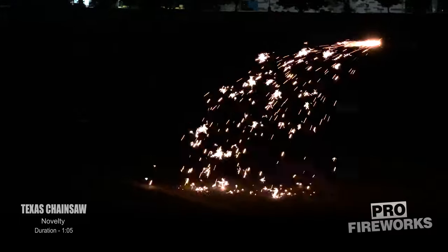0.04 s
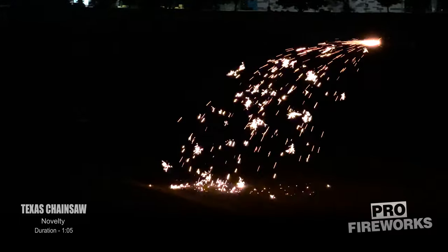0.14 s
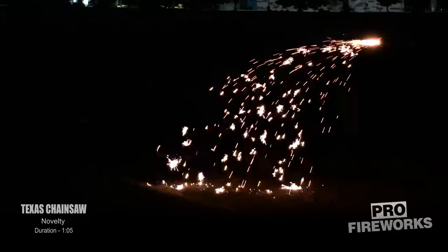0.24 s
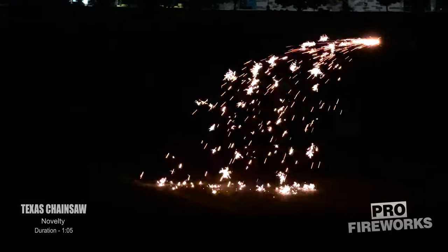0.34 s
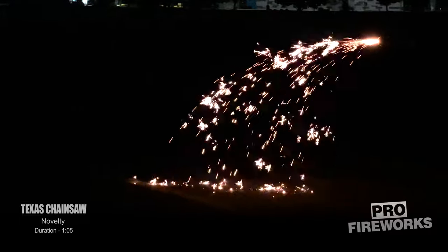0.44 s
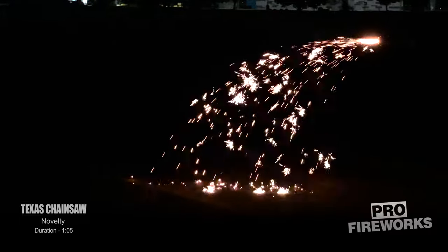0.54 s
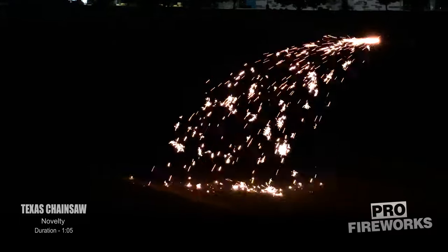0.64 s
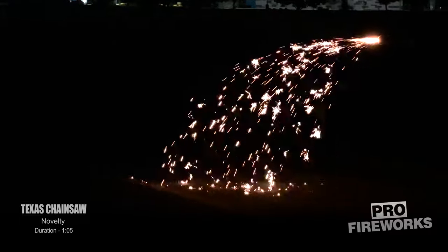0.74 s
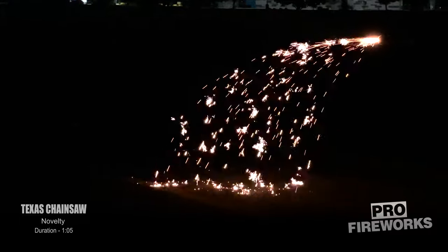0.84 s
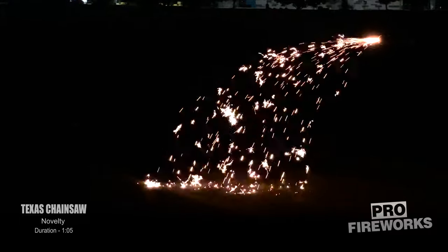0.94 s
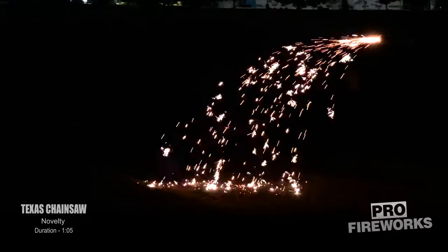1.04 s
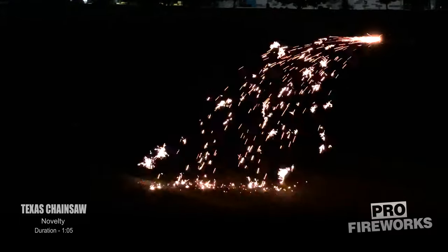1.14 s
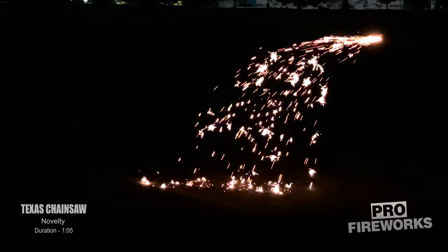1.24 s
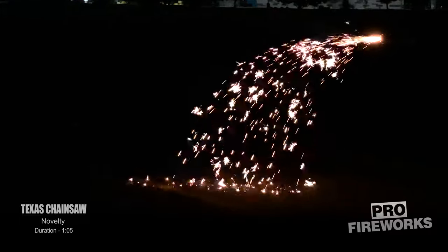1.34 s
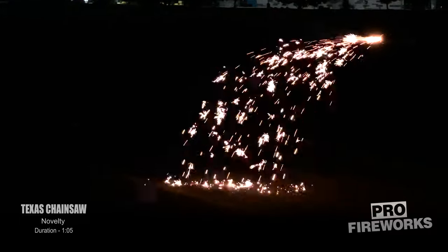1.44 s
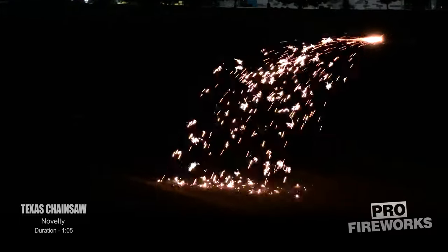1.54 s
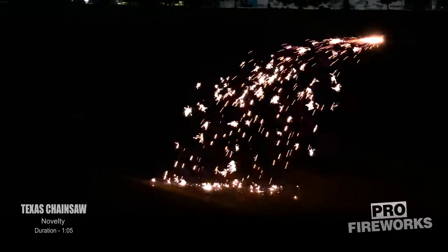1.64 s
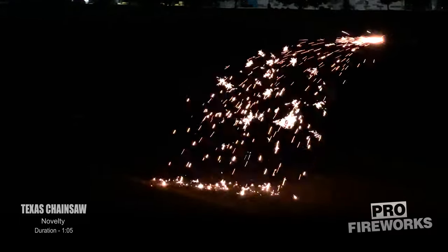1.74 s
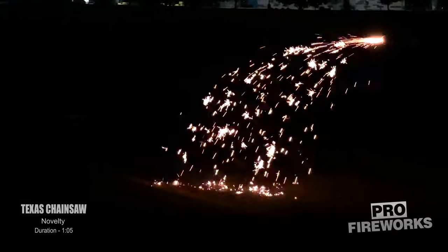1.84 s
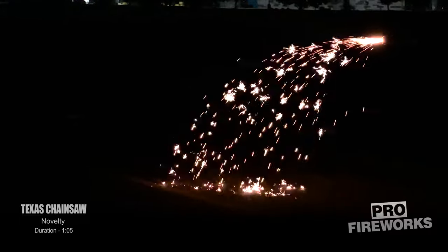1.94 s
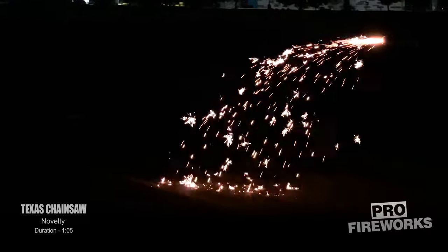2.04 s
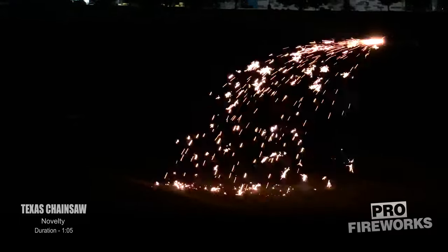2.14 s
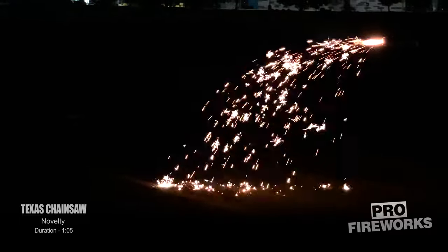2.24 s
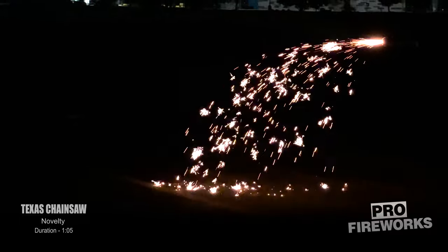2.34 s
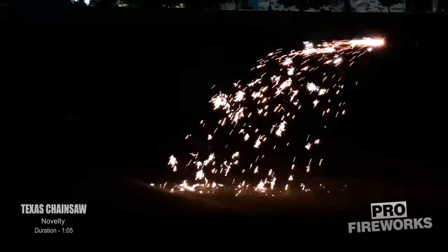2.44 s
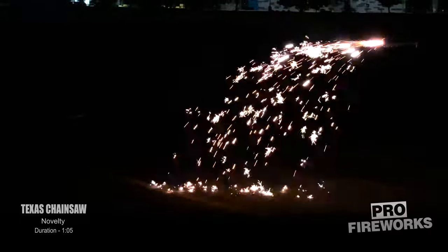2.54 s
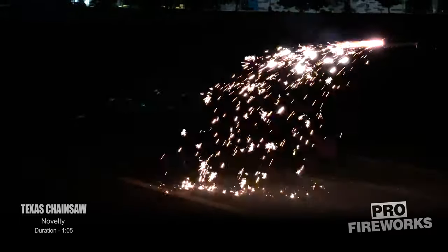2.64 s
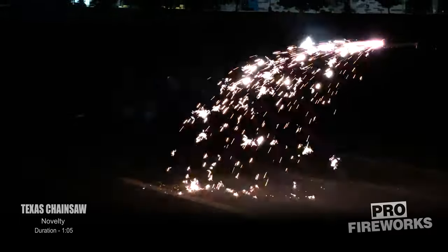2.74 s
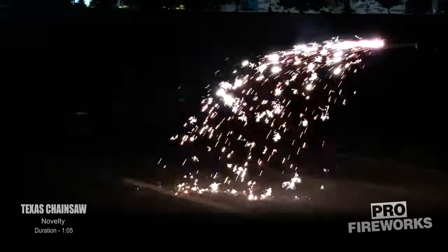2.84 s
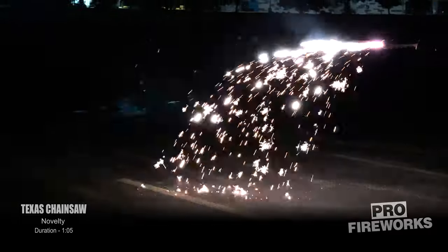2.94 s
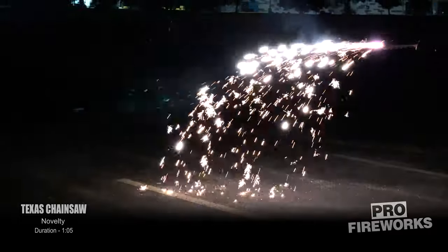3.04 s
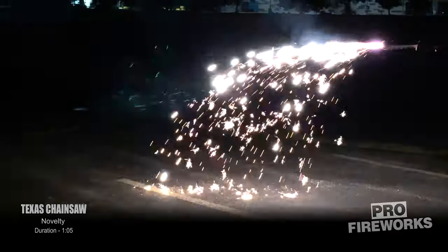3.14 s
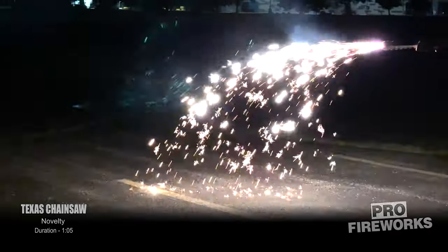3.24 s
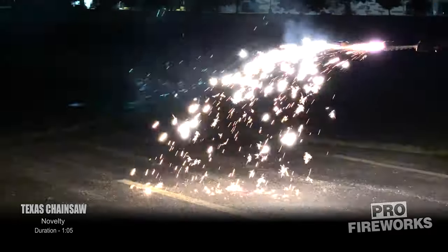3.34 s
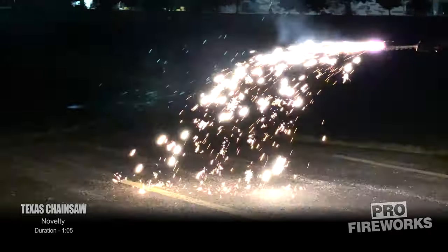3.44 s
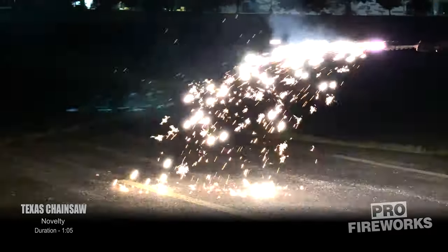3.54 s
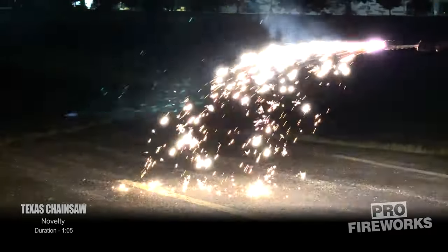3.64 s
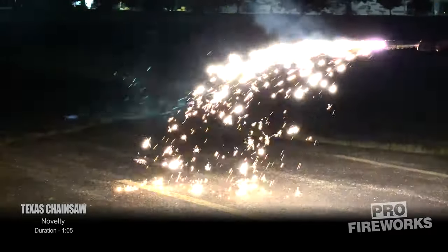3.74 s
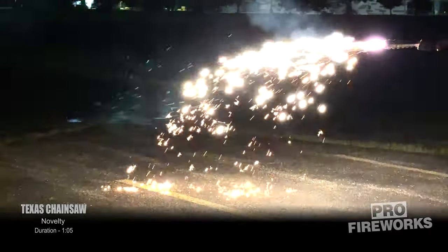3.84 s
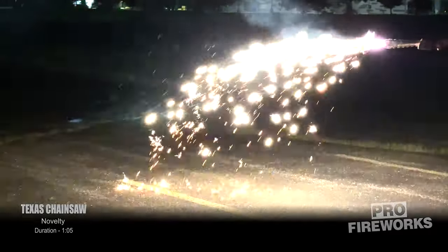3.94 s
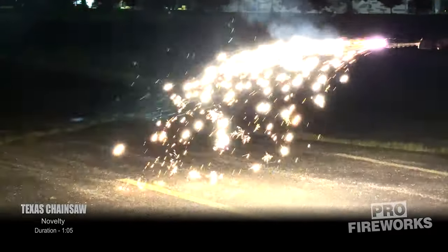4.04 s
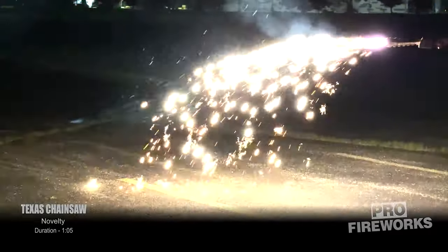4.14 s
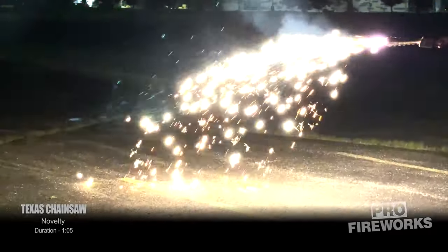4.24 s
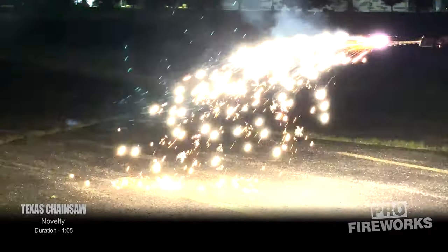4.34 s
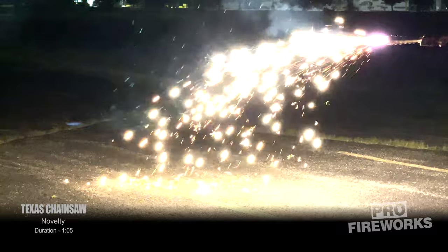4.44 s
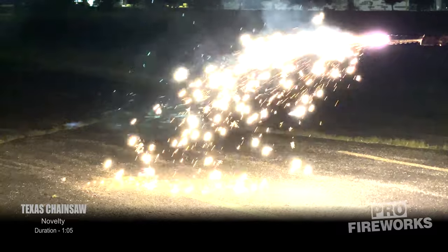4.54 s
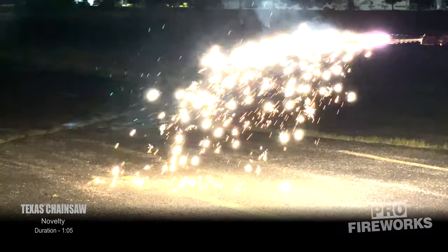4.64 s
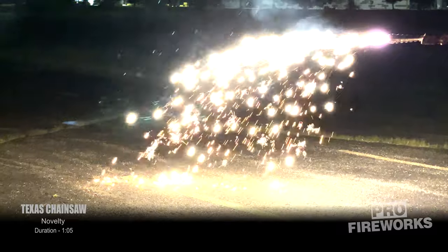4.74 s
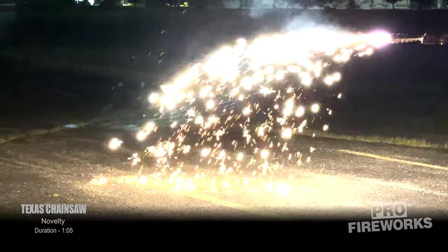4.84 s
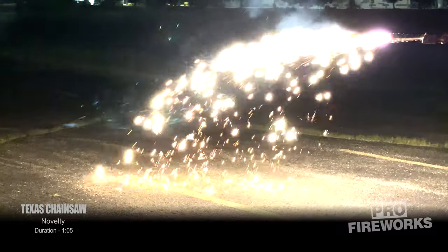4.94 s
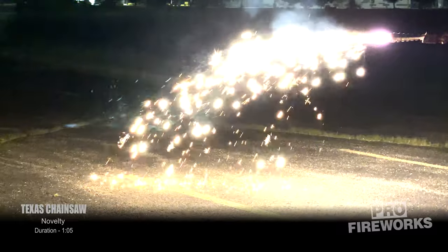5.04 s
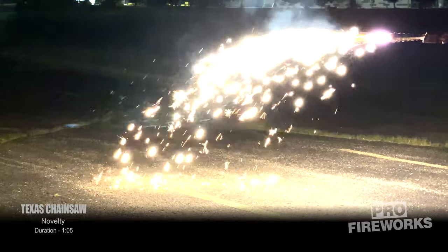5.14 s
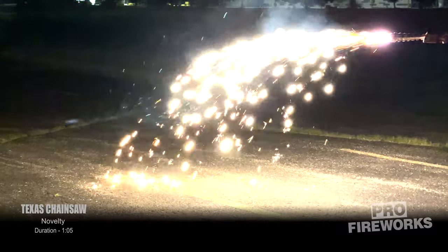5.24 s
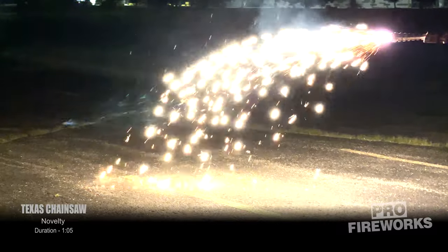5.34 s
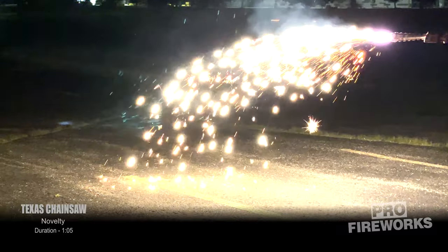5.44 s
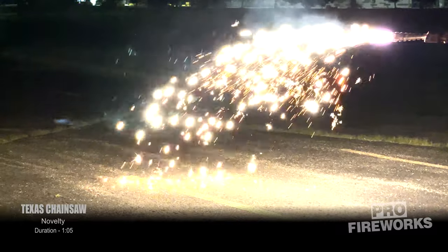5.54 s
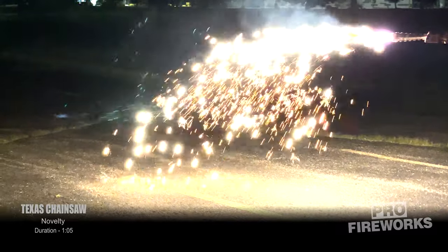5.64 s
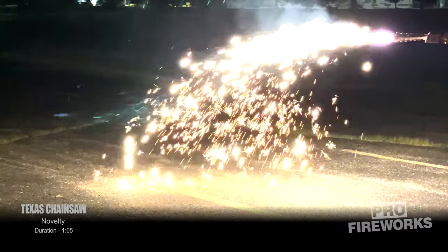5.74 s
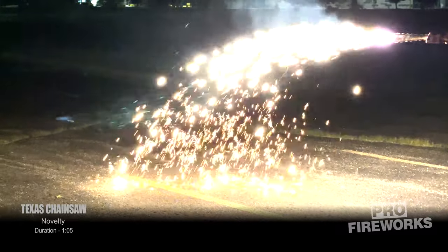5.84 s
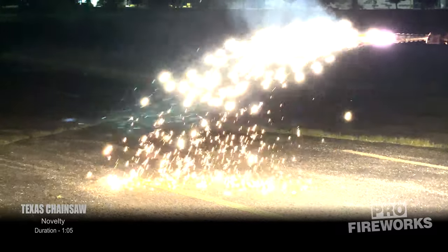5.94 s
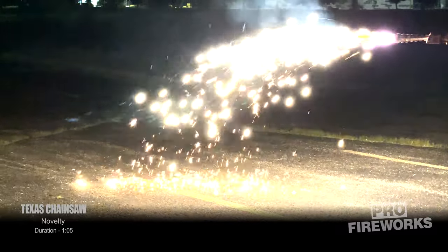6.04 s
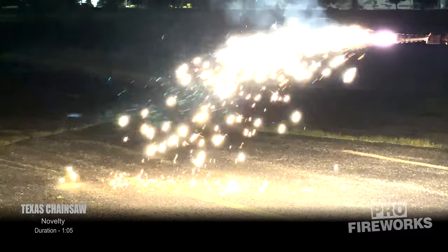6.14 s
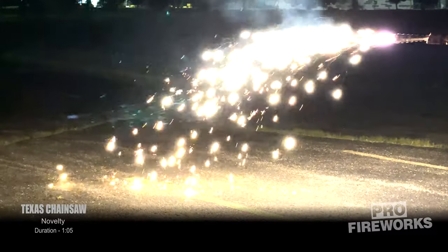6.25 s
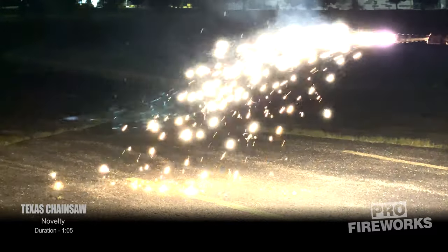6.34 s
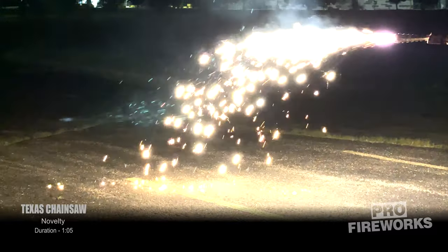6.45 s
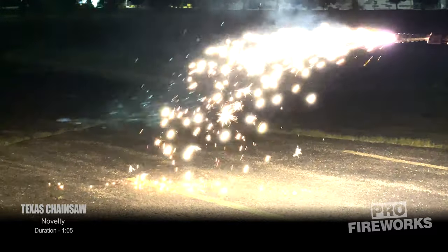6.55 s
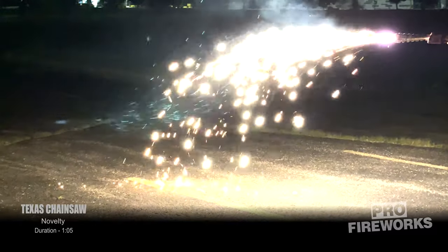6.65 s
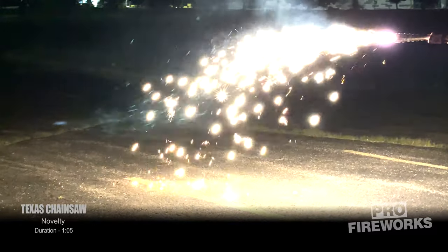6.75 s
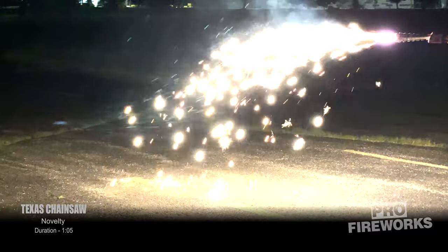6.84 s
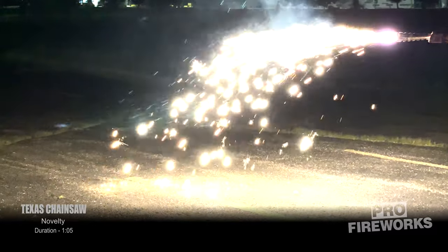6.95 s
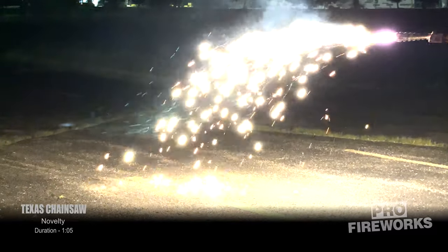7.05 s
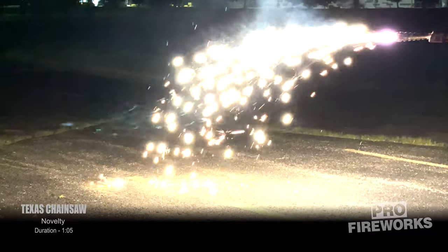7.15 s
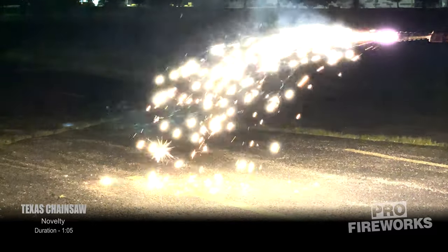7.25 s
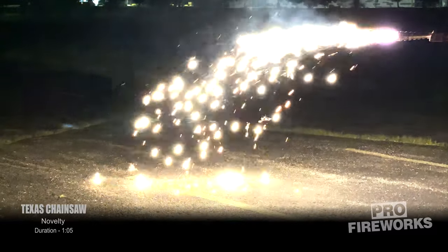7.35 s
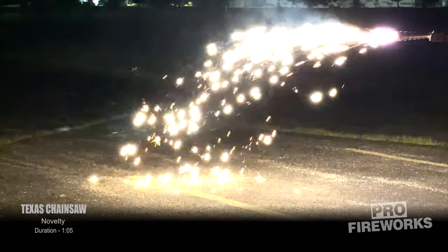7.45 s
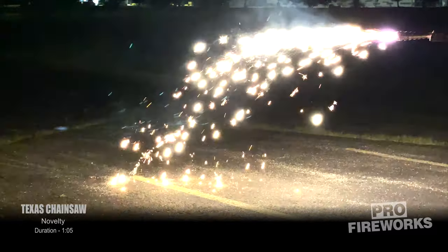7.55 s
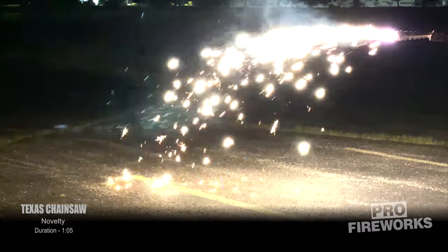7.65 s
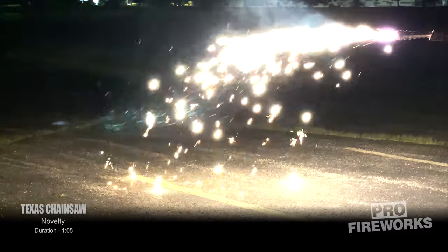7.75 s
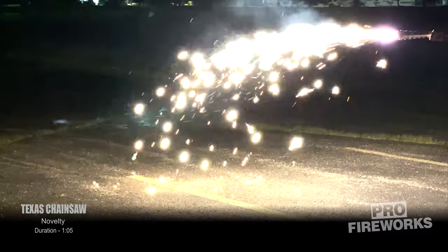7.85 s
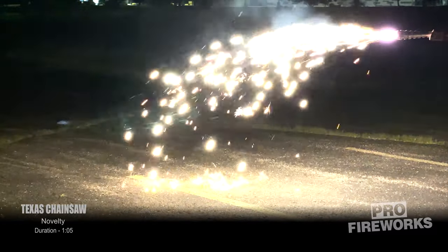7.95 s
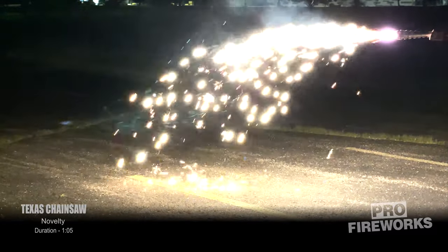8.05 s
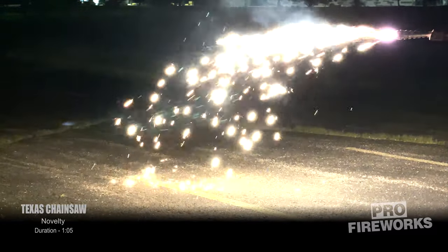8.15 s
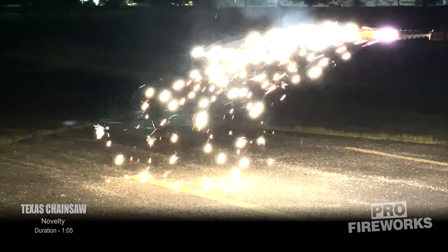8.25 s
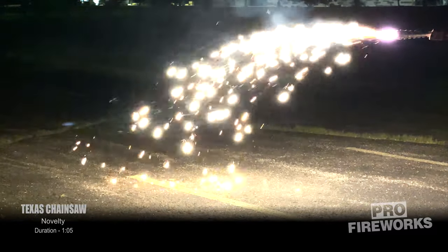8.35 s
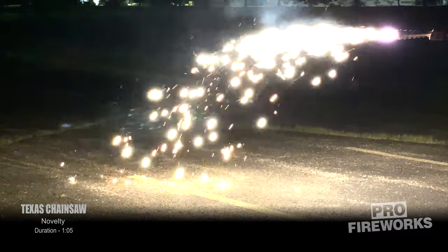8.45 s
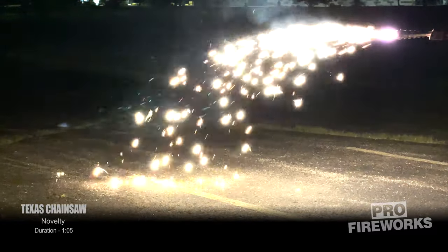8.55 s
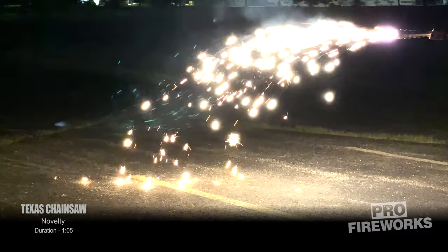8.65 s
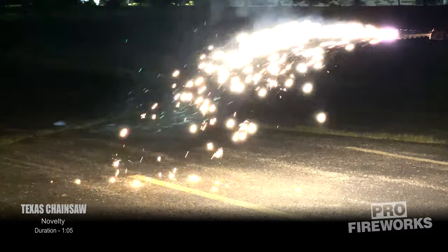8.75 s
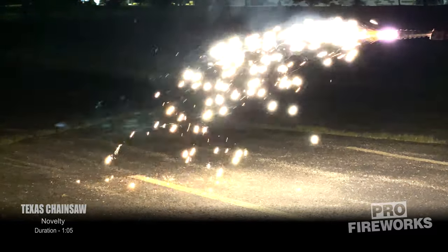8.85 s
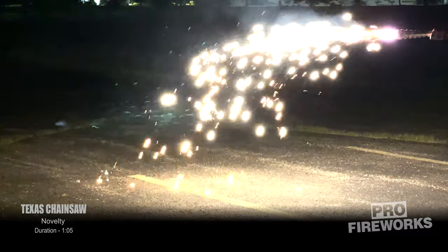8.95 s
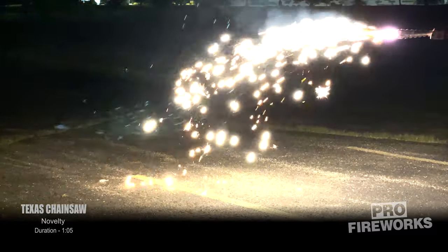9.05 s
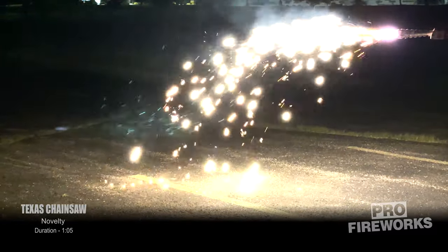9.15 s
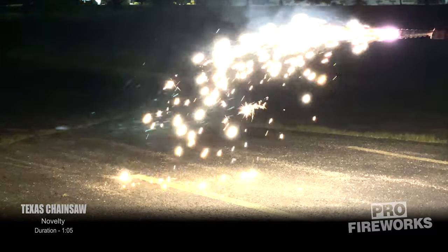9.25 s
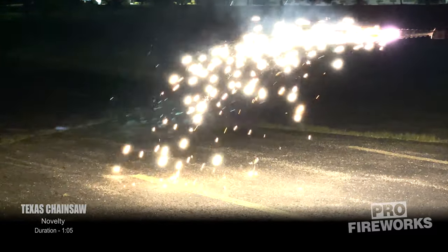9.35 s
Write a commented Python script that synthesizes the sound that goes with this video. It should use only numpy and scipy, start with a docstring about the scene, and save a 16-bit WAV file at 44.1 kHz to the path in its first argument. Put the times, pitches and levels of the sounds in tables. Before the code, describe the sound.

Outdoors on a paved lot at night, a sideways spark fountain starts as a faint fizz beneath distant traffic rumble and a low machine hum. Around three seconds it flares into a fluttering roar and bright hiss, with dense irregular pops and snaps doubled by the pavement. It keeps burning strongly to the end, hissier late on. The microphone faces it from the front, nearly centred, with little echo.

```python
"""A spark fountain burns sideways from a stand on a paved lot at night and flares up after a few seconds.
Its gas jet is fluttering noise, a roar and a hiss, combed by the bounce off the pavement.
The sparks fizz as dense random clicks over fine noise; the big ones pop as single shaped clicks.
Behind lie distant traffic, a swelling low rumble, and a machine hum of narrow noise bands.
Two microphone ports hear it all from the front, with a little scattered sound to the sides."""
import sys
import numpy as np
from scipy import signal
from scipy.fft import rfft, irfft, next_fast_len
from scipy.io import wavfile
from scipy.ndimage import uniform_filter1d

SR = 44100
rng = np.random.default_rng(int(sys.argv[2]) if len(sys.argv) > 2 else 0)


def put_to_file(sound):
    """Save the sound as 16-bit audio at rate SR, in the file named by the first command-line argument."""
    columns = np.atleast_2d(sound).T  # one column per channel
    safe = np.clip(columns, -1, 1)
    whole_steps = np.round(safe * 32767)
    wavfile.write(sys.argv[1], SR, whole_steps.astype(np.int16))


N = 414981
SIZE = next_fast_len(N)
HZ = np.arange(SIZE // 2 + 1) * SR / SIZE
TIME = np.arange(N) / SR


def undb(db):
    """Gain of a level in dB."""
    return 10 ** (np.asarray(db) / 20)


def along(table):
    """Spread a table of pitch and value over every frequency bin, evenly in log frequency."""
    hz, value = np.transpose(table)
    return np.interp(np.log(HZ + 1), np.log(hz + 1), value)


def shape(x, response):
    """Filter by a frequency response."""
    return irfft(rfft(x, SIZE) * response, SIZE)[..., :N]


def unit(x, lo_hz, hi_hz):
    """Scale so that one band has rms 1."""
    band = shape(x, (HZ > lo_hz) & (HZ < hi_hz))
    return x / band.std()


def walk(rate_hz):
    """Random levels, each held 1 / rate_hz seconds, then smoothed twice; spread 1."""
    hold = int(SR / rate_hz)
    steps = np.repeat(rng.standard_normal(N // hold + 1), hold)
    smooth = uniform_filter1d(uniform_filter1d(steps, hold), hold)[:N]
    return smooth / smooth.std()


def noise(colour):
    """Steady noise with the spectrum of a table."""
    return shape(rng.standard_normal(N), undb(along(colour)))


def clicks(start_s, size, lag_ms, bounce_gain):
    """Impulses, each followed by its bounce off the pavement."""
    x = np.zeros(N)
    direct = np.clip(start_s * SR, 0, N - 1).astype(int)
    bounced = np.clip((start_s + lag_ms / 1000) * SR, 0, N - 1).astype(int)
    np.add.at(x, direct, size)
    np.add.at(x, bounced, size * bounce_gain)
    return x


def nozzle_paths():
    """Direct sound plus delayed, duller copies: their interference combs the spectrum."""
    # indirect paths, the pavement first: lag_ms, level_db, treble_loss_db_per_khz, phase_turn_rad
    bounces = [(1.3327, 0.34, 1.1, -0.034), (1.078, -7, 3.5, 1), (2.8, -8, 7.5, -0.85)]
    response = 1
    for lag_ms, level_db, loss_db, turn_rad in bounces:
        phase = turn_rad - 2 * np.pi * HZ * lag_ms / 1000
        response = response + undb(level_db - loss_db * HZ / 1000) * np.exp(1j * phase)
    return response


def jet(roar_db, hiss_db):
    """Turbulent gas sheds eddies: a roar and a hiss flutter together, with spurts of powder on top."""
    # spectrum of the roar: pitch_hz, relative level_db
    roar_colour = [(40, -28), (150, -0.5), (400, -1), (800, -1), (1500, -0.5), (2500, -6.5), (4000, -18),
                   (8000, -36)]
    # spectrum of the hiss: pitch_hz, relative level_db
    hiss_colour = [(500, -8.5), (1500, 5.5), (3000, 2), (5000, -0.5), (8000, -6.5), (13000, -5.5)]
    # lumps of powder spat through the nozzle: start_s, length_s, level_db (added to the hiss gain)
    spurts = [(4.396, 0.025, -34), (5.354, 0.03, -34), (6.566, 0.013, -40), (8.815, .06, -52)]
    paths = nozzle_paths()
    flutter = walk(18)

    roar = unit(shape(noise(roar_colour), paths), 624, 2160)
    upper = shape(roar, 1 / (1 + (1700 / (HZ + 1)) ** 3))
    # a faster jet sheds smaller eddies, so the upper roar grows more than the rest
    roar = roar - upper + upper * undb(0.75 * (roar_db + 31.5))
    roar = roar * undb(roar_db + 0.39 * flutter + 0.6 * walk(60))

    hiss_gain = undb(hiss_db - 3.5 + 0.29 * flutter + 1.9 * walk(70))
    for start_s, length_s, level_db in spurts:
        inside_s = np.minimum(TIME - start_s, start_s + length_s - TIME)
        hiss_gain = hiss_gain + undb(level_db) * np.clip(inside_s / 0.0027, 0, 1)  # 2.7 ms ramps
    hiss = unit(shape(noise(hiss_colour), paths), 2880, 9700)
    return roar + hiss * hiss_gain


def fizz(fizz_db, count=6000):
    """Countless small sparks crackle at every height, some far louder than the rest, over a fine hiss."""
    # spectrum of the crackle: pitch_hz, relative level_db
    crackle_colour = [(500, -19), (2000, -16), (5000, -1), (8000, -1), (13000, 4)]
    # spectrum of the fine hiss, with the sound chain's upper cut-off near 12.4 kHz:
    # pitch_hz, relative level_db
    bed_colour = [(1000, -10), (3000, -8), (5500, -6.5), (8000, -1), (11000, -3), (11800, -7), (12350, -19),
                  (12500, -30)]
    when, size, height = rng.random((count, 3)).T
    loudness = (1.015 - size) ** -0.55  # a few loud ones among many soft
    lag_ms = 0.2 + 1.1 * height  # higher sparks bounce later
    crackle = shape(clicks(when * N / SR, loudness, lag_ms, 0.75), undb(along(crackle_colour)))
    crackle = unit(crackle, 8200, 10200)
    bed = unit(noise(bed_colour), 8170, 9880) * undb(1.12 * walk(15) + 1.0 * walk(90))
    # the harder it burns, the more the crackle stands out of the hiss
    crackle_gain = undb(-3.5 + 0.8 * (fizz_db + 53.0))
    return undb(fizz_db) * (crackle_gain * crackle + undb(-1.5) * bed)


def small_pops():
    """Smaller bursts at random once the flare is up; high sparks bounce later and are commoner."""
    from_s, pops_per_s = 3.3, 11
    loudest_db, spread_db = -21.5, 5.5  # impulse levels reach down by the spread
    span_s = N / SR - from_s
    when, size, height = rng.random((int(span_s * pops_per_s), 3)).T
    start_s = from_s + when * span_s
    level_db = loudest_db - spread_db * size
    lag_ms = 0.25 + 1.1 * np.sqrt(height)
    return np.array([start_s, level_db, lag_ms]).T


def pops():
    """Sharp bursts, each doubled by the pavement, with a faint short tail off the things around."""
    # big sparks bursting: start_s, level_db (of the impulse before its colour), pavement lag_ms
    big_pops = [(3.0848, -22, 0.86), (3.2366, -22, 1.18), (3.3726, -18, 1.18), (3.3978, -18, 1.13),
                (3.4867, -14, 1.09), (3.5723, -17, 0.86), (3.6378, -17, 1.25), (3.7012, -19, 1.29),
                (3.7397, -20, 1.07), (3.7427, -18, 0.91), (3.7799, -14, 0.88), (3.7982, -15, 0.88),
                (3.8936, -18, 0.93), (3.9031, -14, 1.02), (4.0086, -17, 1.11), (4.1115, -19, 1.0),
                (4.131, -14, 1.07), (4.2648, -8, 1.11), (4.2966, -18, 0.95), (4.3552, -11, 0.88),
                (4.3948, -16, 0.66), (4.4377, -21, 0.84), (4.4667, -12, 0.73), (4.4939, -20, 0.57),
                (4.6065, -13, 0.98), (4.6398, -13, 1.04), (4.686, -13, 0.82), (4.7427, -15, 1.13),
                (4.767, -13, 1.27), (4.8117, -13, 1.02), (4.8363, -16, 0.79), (4.8732, -13, 0.95),
                (4.8807, -16, 0.88), (5.0167, -17, 0.52), (5.0377, -15, 0.5), (5.0407, -21, 0.82),
                (5.093, -16, 0.5), (5.0995, -15, 1.13), (5.1046, -12, 1.09), (5.1289, -21, 1.07),
                (5.138, -19, 1.09), (5.1553, -16, 0.7), (5.162, -17, 1.07), (5.229, -19, 0.82),
                (5.2466, -18, 0.93), (5.2691, -16, 1.13), (5.3058, -21, 1.04), (5.4726, -21, 0.66),
                (5.5005, -16, 0.68), (5.5222, -15, 0.57), (5.6068, -15, 1.07), (5.6229, -17, 1.04),
                (5.6257, -19, 1.07), (5.6719, -21, 1.34), (5.712, -10, 0.39), (5.7718, -18, 0.68),
                (5.805, -16, 1.09), (5.8812, -20, 1.36), (5.9164, -16, 1.2), (5.9685, -13, 0.84),
                (6.0297, -12, 0.88), (6.0735, -19, 0.88), (6.082, -15, 1.16), (6.0902, -16, 1.02),
                (6.0995, -17, 1.29), (6.1741, -20, 0.29), (6.2319, -19, 1.02), (6.2577, -16, 1.02),
                (6.2851, -16, 1.07), (6.371, -11, 1.07), (6.4773, -12, 0.75), (6.5182, -16, 1.2),
                (6.556, -17, 1.27), (6.5678, -9, 0.79), (6.5828, -20, 0.82), (6.622, -14, 0.39),
                (6.639, -14, 1.27), (6.7348, -15, 1.04), (6.77, -15, 0.34), (6.793, -11, 1.04),
                (6.8136, -17, 1.18), (6.8284, -15, 0.79), (6.8597, -17, 0.79), (6.9371, -13, 0.36),
                (6.9488, -12, 1.11), (7.0043, -21, 0.98), (7.0794, -15, 1.22), (7.1515, -17, 1.13),
                (7.1637, -21, 0.27), (7.2734, -11, 0.86), (7.2891, -17, 0.54), (7.3103, -12, 1.07),
                (7.3199, -21, 0.34), (7.3522, -9, 0.68), (7.3881, -18, 1.02), (7.4821, -11, 0.82),
                (7.5149, -16, 0.7), (7.7188, -17, 1.16), (7.8644, -15, 1.18), (7.9108, -18, 1.18),
                (8.0462, -10, 0.7), (8.0649, -14, 1.02), (8.0943, -14, 1.0), (8.0948, -9, 0.82),
                (8.1148, -12, 0.91), (8.3181, -21, 1.16), (8.3488, -12, 1.18), (8.3856, -14, 1.25),
                (8.4395, -14, 1.04), (8.4414, -14, 1.02), (8.4621, -17, 0.95), (8.6296, -21, 1.22),
                (8.7344, -19, 0.39), (8.8178, -8, 1.22), (8.8558, -13, 0.75), (8.8665, -15, 0.93),
                (8.9112, -17, 1.07), (8.9149, -11, 0.68), (8.9784, -21, 0.29), (9.1174, -18, 0.75),
                (9.2657, -20, 1.34), (9.2798, -15, 0.93)]
    # spectrum of a burst: pitch_hz, gain_db
    pop_colour = [(100, -4), (500, 0), (1200, 13.5), (2200, 8.5), (5000, 3), (8000, 7), (11000, 4),
                  (13000, 6.5)]
    start_s, level_db, lag_ms = np.vstack([big_pops, small_pops()]).T
    recoil = 1j * HZ / (700 + 1j * HZ)  # the air swings back after each push
    pairs = clicks(start_s, undb(level_db), lag_ms, undb(-1.5))
    bursts = shape(pairs, undb(along(pop_colour)) * recoil)
    tail = rng.standard_normal(2000) * np.exp(-TIME[:2000] / 0.006)  # 6 ms decay
    return bursts + undb(-34.5) * signal.fftconvolve(bursts, tail)[:N]


def traffic():
    """Distant traffic: low noise, its treble lost, at rms 1 from 25 to 400 Hz."""
    # spectrum of the rumble: pitch_hz, relative level_db
    rumble_colour = [(22, -43), (33, -27), (42, -8.5), (80, -3.5), (100, -4.5), (130, -5), (190, -6.5),
                     (285, -11), (350, -18), (450, -21.5), (700, -24), (1200, -38.5), (2500, -52)]
    return unit(noise(rumble_colour), 25, 400)


def machine_hum():
    """A machine's wavering hum: noise in narrow resonances, the narrower the steadier."""
    # hum bands: pitch_hz, width_hz, level_db (before the deepest part is levelled anew)
    hum_bands = [(57, 15, -54.5), (120.35, 1.72, -54), (133.1, 4.8, -54.5), (224.7, 7.07, -50)]
    hum = np.zeros(N)
    for pitch_hz, width_hz, level_db in hum_bands:
        resonance = 1 / (1 + (2 * (HZ - pitch_hz) / width_hz) ** 2)
        hum = hum + undb(level_db) * unit(shape(rng.standard_normal(N), resonance), 20, 400)
    return hum


def town():
    """Traffic and hum together; their deepest part is split off so that it swells and sinks by itself."""
    # one chance course of the deepest rumble, swelling and sinking: start_s, level_db
    deep_levels = [(0, -45), (2.7, -45.5), (4.0, -44), (4.45, -47.5), (5.0, -44), (5.7, -40.5), (6.3, -46),
                   (7.0, -44), (7.75, -39.5), (8.4, -46), (9.1, -41.5), (9.41, -46)]
    rumble = traffic() * undb(-40 + 0.72 * walk(0.83)) + machine_hum()
    deep = shape(rumble, 1 / (1 + (HZ / 95) ** 4))
    deep_db = np.interp(TIME, *np.transpose(deep_levels)) + 1.5 * walk(4)  # finer wavering on top
    return rumble - deep + unit(deep, 35, 115) * undb(deep_db)


def scene():
    """All sources lie ahead; a weak scattered share reaches the two ports in opposite sign."""
    # how hard it burns, before each layer's own trims: start_s, roar_db, hiss_db, fizz_db
    burn = [(0, -54, -65.5, -64.5), (1.25, -48.5, -63.5, -64), (2.12, -50.5, -66.5, -65),
            (2.4, -46.5, -65, -63), (2.85, -41, -57, -62), (3.4, -36.5, -48.5, -55.5),
            (4.3, -35.5, -45, -54), (5.3, -34.5, -43, -54), (5.42, -34.5, -48, -52.5),
            (5.66, -36, -45.5, -54), (6.15, -34.7, -45.5, -53), (6.75, -34.5, -44.5, -53.5),
            (7.4, -35, -48, -53), (7.85, -35, -46.5, -55.5), (8.1, -33.5, -37.5, -52),
            (8.4, -34, -41.5, -55), (8.76, -34.3, -41.5, -55), (8.85, -32.7, -37, -53),
            (9.1, -33, -36.5, -54), (9.41, -35, -38, -54)]
    # scattered sound under the direct sound: pitch_hz, level_db
    scatter_colour = [(500, -34.5), (1000, -17), (3000, -20), (6000, -20.5), (9000, -19), (10300, -19),
                      (12000, -6)]
    start_s, *columns = np.transpose(burn)
    roar_db, hiss_db, fizz_db = (np.interp(TIME, start_s, column) for column in columns)
    fountain = jet(roar_db, hiss_db) + fizz(fizz_db) + pops()

    scatter = rng.standard_normal(8000) * np.exp(-TIME[:8000] / 0.0256)  # 25.6 ms decay
    scatter = scatter / np.linalg.norm(scatter)
    side = shape(signal.fftconvolve(fountain, scatter)[:N], undb(along(scatter_colour)))
    side = side + traffic() * undb(-76.5)  # a little traffic comes from the sides
    ahead = fountain + town()
    return np.array([ahead + side, ahead - side])


def record(dry):
    """The ports ring near 10.6 kHz and turn the treble's phase, the right one more; the top is cut."""
    # response of both ports, with the sound chain's steep upper cut-off: pitch_hz, gain_db
    port_response = [(8000, 0), (9500, 0.5), (10600, 5), (11400, 1), (12200, -8), (12550, -13),
                     (12800, -30), (13000, -30)]
    # phase lead of the left port, treble first: pitch_hz, lead_rad
    left_lead = [(2000, 0), (6000, .4), (8000, 1.8), (10000, 5), (13000, 7.3)]
    # phase of the left port ahead of the right: pitch_hz, lead_rad
    left_before_right = [(0, 0), (690, -0.4), (950, -0.1), (1380, -0.4), (2930, 0.7), (4740, 0.4),
                         (6200, -0.0), (7410, 0.1), (8010, 0.5), (8870, -0.3), (9300, -1.7), (10300, -3.2),
                         (11800, -6.1), (12700, -6.5)]
    # level of the left port over the right: pitch_hz, level_db
    left_over_right = [(60, 1.0), (110, 1.0), (200, 0.5), (360, 0.0), (640, -1.5), (1160, -1.5),
                       (2100, -1.0), (3800, 0.0), (6880, 0.0), (12400, 0.0)]
    half = undb(along(left_over_right) / 2)  # shared between the two ports
    common = undb(along(port_response)) * np.exp(1j * along(left_lead))
    right_turn = np.exp(-1j * along(left_before_right))
    ports = np.array([common * half, common / half * right_turn])
    top_cut = signal.ellip(6, 0.1, 40, 13055, fs=SR, output="sos")  # lowpass, edge in Hz
    return signal.sosfiltfilt(top_cut, shape(dry, ports))


dry = scene()
out = record(dry)
put_to_file(out)
```